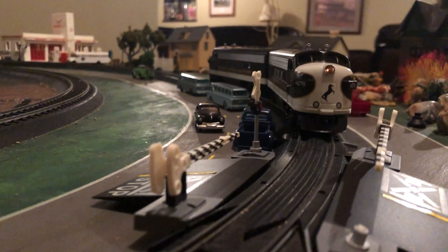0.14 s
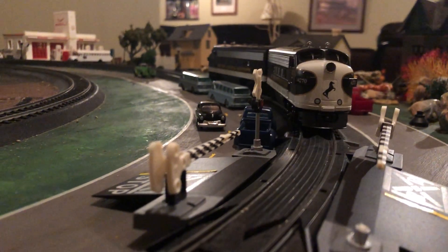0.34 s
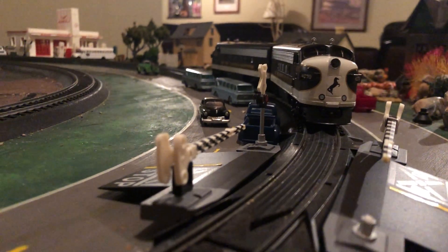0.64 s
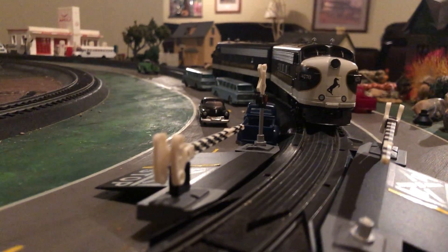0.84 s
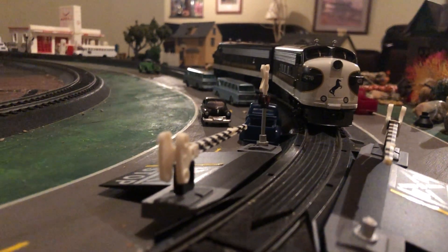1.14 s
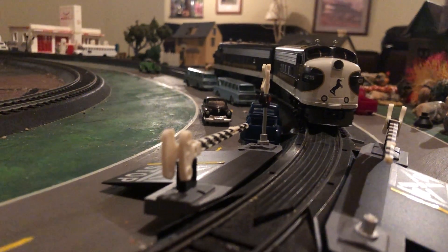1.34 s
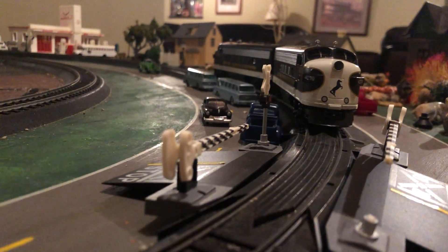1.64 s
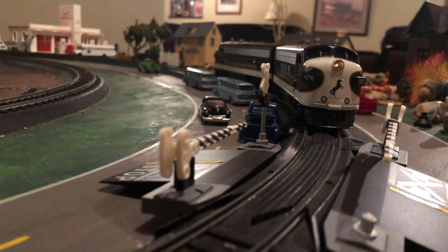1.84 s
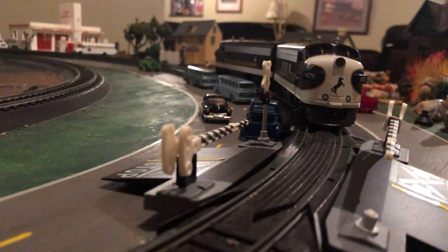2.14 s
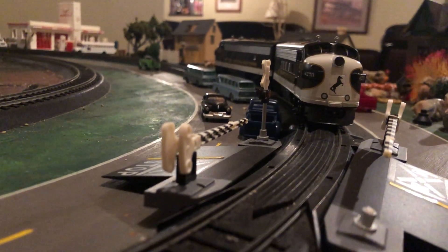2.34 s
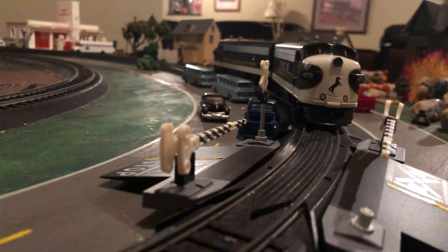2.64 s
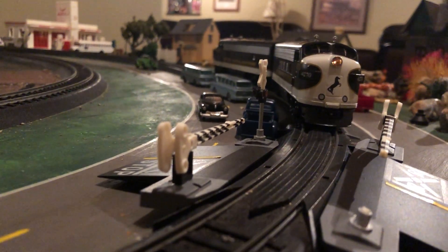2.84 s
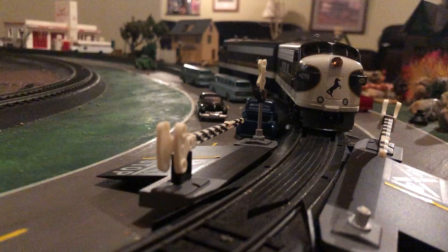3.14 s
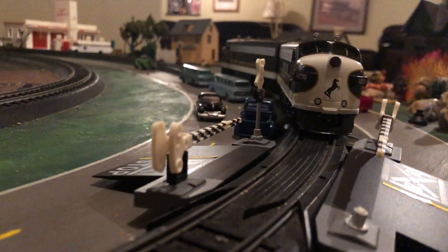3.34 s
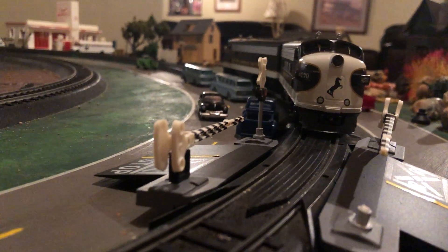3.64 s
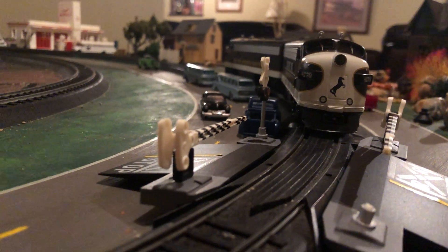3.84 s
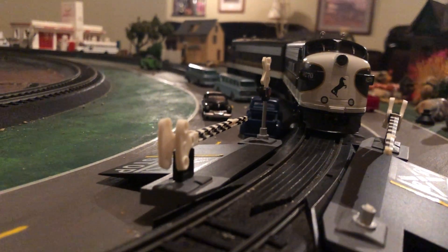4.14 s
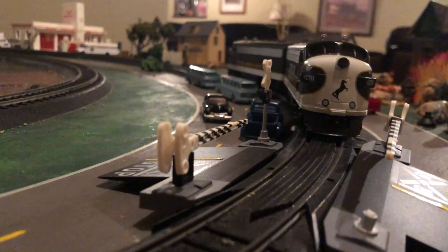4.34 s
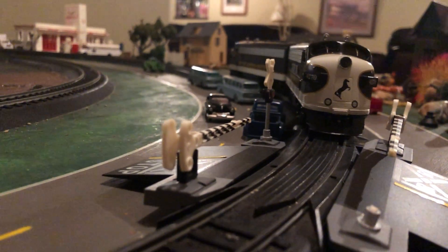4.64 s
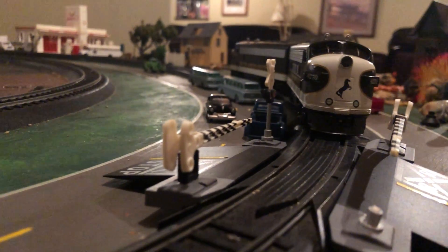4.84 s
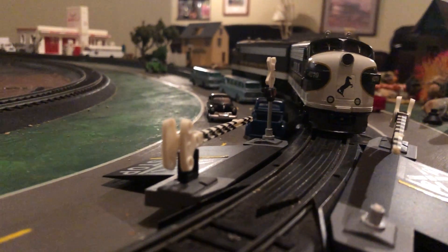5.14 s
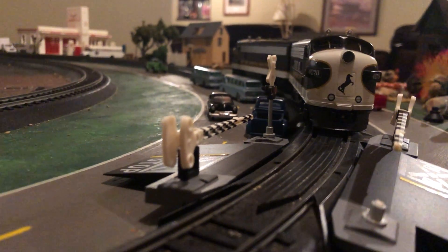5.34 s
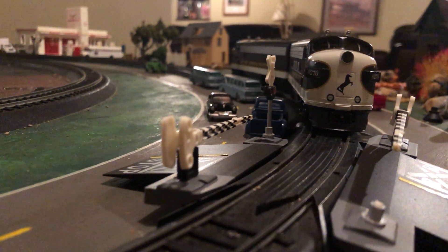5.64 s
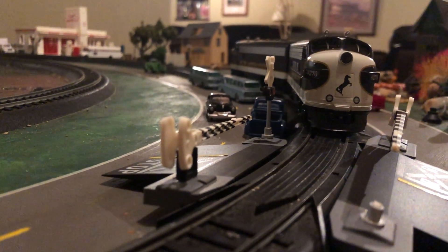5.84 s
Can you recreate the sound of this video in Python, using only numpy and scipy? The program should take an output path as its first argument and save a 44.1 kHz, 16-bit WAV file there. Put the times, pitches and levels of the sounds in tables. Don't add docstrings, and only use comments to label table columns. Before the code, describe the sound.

Close fumbling with a plastic toy housing, with sharp clicks, dry scraping bursts, little thuds and rubbery creaks over faint room hush.

```python
import sys
import numpy as np
from scipy import signal
from scipy.io import wavfile
from scipy.ndimage import uniform_filter1d

SR = 44100
rng = np.random.default_rng(int(sys.argv[2]) if len(sys.argv) > 2 else 0)


def persist_wave(psi):
    counts = np.round(np.clip(psi, -1, 1) * 32767).astype(np.int16)
    wavfile.write(sys.argv[1], SR, np.atleast_2d(counts).T)


def natural_amplitude(level_db):
    exponent = np.asarray(level_db, float) / 20
    return 10 ** exponent


N = 264600


def rms_one(x):
    return x / np.sqrt(np.mean(x ** 2) + 1e-20)


def peak_one(x):
    return x / np.max(np.abs(x))


def add(out, s, sound):
    i = round(s * SR)
    out[i:i + len(sound)] += sound[:N - i]


def band(x, low_hz, high_hz, order=2):
    edges_hz = [low_hz, min(high_hz, 0.45 * SR)]
    return signal.sosfilt(signal.butter(order, edges_hz, "band", fs=SR, output="sos"), x)


def drift(rate_hz, size=1):
    r = np.exp(-2 * np.pi * rate_hz * size / SR)
    white = rng.standard_normal((N + SR) // size + 1)
    slow = signal.lfilter([1], [1, -2 * r, r * r], white)[SR // size:]
    return np.interp(np.arange(N) / size, np.arange(len(slow)), rms_one(slow))


def resonate(x, peaks):
    out = 0
    for k, (hz, width_hz, db) in enumerate(peaks):
        r = np.exp(-np.pi * width_hz / SR)
        b = [(1 - r * r) / 2, 0, (r * r - 1) / 2]
        a = [1, -2 * r * np.cos(2 * np.pi * hz / SR), r * r]
        out = out + (-1) ** k * natural_amplitude(db) * signal.lfilter(b, a, x + 1e-18)
    return out


def coloured(x, spectrum, patchy_db):
    hz, db = np.transpose(spectrum)
    edges = hz[0] * 2 ** np.arange(0, np.log2(hz[-1] / hz[0]) + 0.3, 1 / 3)
    out = 0
    for k, (low, high) in enumerate(zip(edges, edges[1:])):
        level_db = np.interp(np.log(low * high) / 2, np.log(hz), db)
        flicker_db = patchy_db * drift(21, size=32)
        out = out + natural_amplitude(level_db + flicker_db) * band(x[k % 2], low, high)
    return rms_one(out)


def swells(rows, rest_db, rise_db_per_s, fall_db_per_s):
    t = np.arange(0, N + 32, 32) / SR
    out = np.full(len(t), float(rest_db))
    for s, length, db in rows:
        before, after = np.maximum(s - t, 0), np.maximum(t - s - length, 0)
        out = np.maximum(out, db - rise_db_per_s * before - fall_db_per_s * after)
    return np.interp(np.arange(N) / SR, t, out)


def burst(noise, decay_s):
    return noise * np.exp(-np.arange(len(noise)) / SR / decay_s)


def strike(noise, modes, lag_s, crackle_s, tilt_db, edge):
    out = np.zeros(noise.shape[1] + 800)
    for (hz, width_hz, db), crackle in zip(modes, noise):
        late_s = lag_s * np.log2(16000 / hz)
        kick = np.r_[edge, crackle[1:]]
        ring = resonate(burst(kick, crackle_s + late_s / 3), [(hz, width_hz, 0)])
        brighter_db = tilt_db * max(np.log2(hz / 3500), 0)
        add(out, late_s / 2, natural_amplitude(db + brighter_db) * np.sqrt(width_hz) * rms_one(ring))
    return peak_one(out)


# f/Hz, level/dB
HUSH = [(18, -35.5), (30, 1.5), (235, 2), (835, -3), (1060, -7.5), (1840, -20), (2220, -16.5),
        (3130, -23.5), (5300, -22), (14800, -21), (16500, -42)]
# t/s, level/dB
WHINE = [(0, -81), (.3, -67.5), (.475, -76), (.5, -83.5), (.53, -75), (.6, -79), (1, -87), (2, -90),
         (2.3, -88), (4.9, -93), (5.05, -86), (5.15, -84), (6, -90)]
HUSH_DB, WHINE_HZ = -70.5, 1647


def hush():
    tone = np.sin(2 * np.pi * np.cumsum(WHINE_HZ + 3 * drift(4.7)) / SR)
    s, db = np.transpose(WHINE)
    whine = natural_amplitude(np.interp(np.arange(N) / SR, s, db)) * tone
    return natural_amplitude(HUSH_DB) * coloured(rng.standard_normal((2, N)), HUSH, patchy_db=3.5) + whine


# t/s, length/s, scrape level/dB, board weight/dB, cloth share/dB
STROKES = [(0, 0.052, -44.5, 1, -7.5), (0.065, 0.16, -48, -4, -8.5), (0.64, 0.041, -66.5, 1, -5.5),
           (0.677, 0.017, -71, 8, 2), (0.934, 0.11, -64.5, 4, -1.5), (1.052, 0.069, -72.5, 12.5, -7.5),
           (1.133, 0.18, -68.5, -2, -10), (1.683, 0.0091, -41.5, -9, -5.5), (1.71, 0.016, -45.5, -4, -10),
           (1.743, 0.012, -42, 0.5, -4), (1.761, 0.06, -49.5, 1, -9.5), (1.835, 0.11, -55.5, 1.5, -8.5),
           (2.221, 0.12, -71.5, -4, -5), (2.498, 0.16, -66.5, -7, -21.5), (2.658, 0.043, -60.5, 1, -16),
           (2.709, 0.098, -56.5, 0.5, -10), (2.819, 0.04, -49.5, -3, -4.5), (2.887, 0.048, -51, -4, -10.5),
           (2.955, 0.355, -52, 0, -6), (3.328, 0.29, -66, -5.5, -17.5), (3.892, 0.11, -65, 1.5, -7.5),
           (4.424, 0.16, -68.5, -2, -6.5), (4.606, 0.11, -62.5, -19, -12.5), (4.721, 0.15, -71, 5.5, -25.5),
           (4.933, 0.07, -67, 1, -9.5), (5.122, 0.13, -74.5, -4.5, -6.5), (5.5, 0.23, -76, -12, -13)]
# t/s, length/s, level/dB
SHAKES = [(.3, 0.018, -73.5), (.99, 0.13, -64.5), (1.77, 0.022, -73.5), (2, 0.051, -63.5),
          (2.3, 0.29, -75.5), (3.91, 0.11, -63), (4.25, 0.035, -66.5), (4.6, 0.017, -56.5),
          (4.86, 0.048, -61), (5.01, 0.039, -68.5)]
# f/Hz, level/dB
SCRAPE = [(250, -37.5), (420, -7), (775, -1.5), (885, 0), (2440, -4.5), (2720, -8.5), (3080, -3.5),
          (6000, -21.5), (7800, -43), (13200, -120)]
# f/Hz, level/dB
CLOTH = [(1760, -27.5), (3000, -2), (3410, 3), (4220, -2), (4600, 3.5), (8500, -8), (15100, -15.5),
         (16200, -18.5), (16500, -48)]
# f/Hz, width/Hz, level/dB
PANEL = [(925, 130, 0.5), (1380, 54, -5), (1840, 100, -4), (2374, 210, -4), (3150, 150, -1), (3480, 70, -1)]
# f/Hz, width/Hz, level/dB
PORT = [(7300, 920, -5.5), (12570, 1400, 3), (15000, 900, 6.5)]
GRIP_DB_PER_S, LIFT_DB_PER_S = 899.5, 447
REST_THUD_DB, REST_SCRAPE_DB, REST_CLOTH_DB = -79, -80.5, -84.5
SHAKE_DB_PER_S, SETTLE_DB_PER_S, REST_RUMBLE_DB = 131, 87, -82.5
FIBRES_PER_S, FIBRE_DB = 870, -2.5


def dragging():
    s, length, db, weight_db, cloth_db = np.transpose(STROKES)

    def stroke_db(share_db, rest_db):
        return swells(zip(s, length, db + share_db), rest_db, GRIP_DB_PER_S, LIFT_DB_PER_S)

    catching = drift(43)
    grit = rng.standard_normal((2, N)) * natural_amplitude(1.1 * catching + 1.8 * drift(360))
    snapped = signal.lfilter([1], [1, -0.97], rng.random(N) < FIBRES_PER_S / SR)

    rumble_db = swells(SHAKES, REST_RUMBLE_DB, SHAKE_DB_PER_S, SETTLE_DB_PER_S)
    rumble = natural_amplitude(rumble_db) * rms_one(band(rng.standard_normal(N), 43, 76))

    thud_db = stroke_db(weight_db, REST_THUD_DB) + 1.1 * catching + 2.7 * drift(20, size=32)
    thud = natural_amplitude(thud_db) * rms_one(band(rng.standard_normal(N), 110, 370, order=3))

    scrape = coloured(grit, SCRAPE, patchy_db=1.2)
    scrape = rms_one(scrape + sum(resonate(scrape, [mode]) for mode in PANEL))
    scrape = natural_amplitude(stroke_db(0, REST_SCRAPE_DB)) * scrape

    hiss = coloured(grit[::-1] * (1 + natural_amplitude(FIBRE_DB) * snapped), CLOTH, patchy_db=1.5)
    hiss = rms_one(hiss + sum(resonate(hiss, [cavity]) for cavity in PORT))
    hiss = natural_amplitude(stroke_db(cloth_db, REST_CLOTH_DB)) * hiss
    return rumble + thud + scrape + hiss


# t/s, peak level/dB
THREADS = [(0.0767, -40), (1.6849, -31), (1.695, -45), (1.7719, -41), (1.789, -41), (1.8064, -49),
           (1.8214, -46), (1.855, -53), (2.4493, -53), (2.6413, -58), (2.655, -57), (2.727, -47),
           (2.7692, -48), (2.845, -41), (2.862, -46), (2.8913, -46), (2.9043, -41), (2.9105, -46),
           (2.935, -57), (2.9552, -47), (2.9946, -57), (3.0314, -63), (3.0849, -45), (3.29, -53)]


def threads():
    out = np.zeros(N)
    for (s, peak_db), noise in zip(THREADS, rng.standard_normal((len(THREADS), 600))):
        crack = band(burst(noise, 0.0022), 2600, 8000)
        add(out, s, natural_amplitude(peak_db + 2.5) * peak_one(crack))
    return out


# f/Hz, width/Hz, level/dB
HOUSING = [(410, 41, -8), (645, 70, -8), (1095, 160, -5.5), (1407, 32, 0), (1784, 100, -6), (1880, 72, -2),
           (2410, 120, -15), (2750, 70, -6), (3135, 240, -1.5), (3685, 91, -2.5), (3927, 53, -2.5),
           (4818, 84, -19)]
# t/s, peak level/dB, crack level over 4 kHz/dB
TICKS = [(0.189, -24, -49.5), (0.2486, -28, -52), (1.388, -28.5, -61), (1.422, -41, -60),
         (1.539, -27.5, -50.5), (1.632, -29.5, -55), (1.663, -32, -48), (1.672, -25.5, -55),
         (1.772, -42, -51.5), (2.293, -36.5, -58.5), (2.716, -39, -53.5), (2.784, -34, -61),
         (2.765, -47, -49), (2.969, -35, -49), (3.0618, -41, -38.5), (3.305, -31.5, -50), (4.447, -40, -65),
         (4.861, -39, -68.5), (5.112, -28.5, -81.5), (5.49, -45, -69), (5.5, -28.5, -59),
         (5.696, -34.5, -81), (5.823, -55, -72), (5.834, -28.5, -66), (5.93, -34, -81)]
# t/s, peak level/dB, knock under 1.1 kHz/dB, crack over 4 kHz/dB
BUMPS = [(.159, -24, -36, -46), (.177, -29.5, -62, -48), (.349, -45, -61.5, -78), (.794, -35.5, -58, -57),
         (.812, -39, -43, -40), (.946, -34.5, -43.5, -47), (.99, -38.5, -47.5, -51.5),
         (1.056, -47, -47.5, -63), (1.692, -48, -34.5, -53), (1.75, -32, -44, -48),
         (2.105, -45, -55, -64.5), (2.457, -59, -49, -60), (2.557, -46, -54, -71), (2.821, -29, -47, -50),
         (2.829, -41.5, -50, -46.5), (3.759, -52.5, -62, -62), (3.887, -53, -48.5, -63.5),
         (3.947, -66, -52.5, -60), (3.999, -58, -49, -62.5), (4.282, -57.5, -56.5, -83.5),
         (4.417, -59.5, -51, -76.5), (4.497, -55.5, -62.5, -64.5), (4.53, -36.5, -41.5, -44.5),
         (4.781, -44.5, -47.5, -61.5), (4.922, -55, -47, -53), (.705, -59, -53.5, -69),
         (1.085, -64, -51.5, -75), (1.745, -43, -40.5, -63), (.36, -60.5, -59.5, -76)]
TICK_KNOCK_DB = -24
TICK_EDGE = 1.3


def ticks():
    breaks = BUMPS + [(s, db, db + TICK_KNOCK_DB, crack_db) for s, db, crack_db in TICKS]
    out, noise = np.zeros(N), rng.standard_normal((len(breaks), len(HOUSING) + 2, 2600))
    damped = [(hz, 0.2 * width_hz + 110, db) for hz, width_hz, db in HOUSING]
    for (s, peak_db, knock_db, crack_db), (knock, crack, *rings) in zip(breaks, noise):
        ring = strike(np.array(rings), damped, lag_s=0.0005, crackle_s=0.001, tilt_db=-2.5, edge=TICK_EDGE)
        knock = band(burst(knock, 0.0072), 100, 1100)
        crack = band(burst(crack, 0.0022), 4000, 15000)
        add(out, s, natural_amplitude(peak_db - 5.0) * peak_one(band(ring, 650, 7700)))
        add(out, s, natural_amplitude(knock_db + 3.5) * peak_one(knock))
        add(out, s, natural_amplitude(crack_db + 4.5) * peak_one(crack))
    return out


# t/s, peak level/dB,
# f/Hz, decay/cycles
TAPS = [(.1615, -32, 325, 1.42), (.164, -38.5, 200, 2.8), (.35, -50, 192, 2.1), (.703, -54, 217, 4.0),
        (.835, -37.5, 200, 2.9), (1.689, -32.5, 237.4, 1.37), (1.755, -53, 75, 2.6), (2.828, -35, 334, 1.7),
        (3.59, -58.5, 190.3, 2.8), (5.153, -59.5, 240, 2.52), (.1617, -23, 4040, 1.2),
        (.1765, -31.5, 5960, 3.0), (.2503, -35, 6000, 2.2), (.801, -51.5, 10960, 4.9),
        (.8355, -38, 12300, 9.0), (1.3868, -49, 8900, 1.5), (1.6625, -38.5, 6000, 2.62),
        (1.698, -35.5, 6900, 3.63), (1.7505, -29, 3600, 4.8), (1.7718, -32, 5800, 3.5),
        (2.8213, -31.5, 6900, 3.0), (2.8297, -37, 3540, 1.2), (2.9955, -46, 6500, 3.0),
        (3.0204, -46, 3750, 2.7), (3.062, -31, 3380, 1.18), (3.0855, -51, 7000, 2.95),
        (3.166, -39, 3410, 2.83), (3.588, -27, 3900, 1.32), (4.552, -36.5, 10430, 6.0),
        (0.8247, -8.5, 3900, 3.5), (4.5425, -18, 2549, 1.1), (4.5445, -15.5, 2090, 2.5),
        (4.519, -47, 11000, 1.5), (3.76, -54, 5000, 4.3), (3.865, -65, 3500, 2.5), (5.9075, -48, 3300, 2.5),
        (5.916, -49, 3412, 2.5), (5.998, -51, 1490, 1.5)]


def taps():
    out = np.zeros(N)
    for s, peak_db, hz, cycles in TAPS:
        turns = np.arange(round(8 * cycles * SR / hz)) * hz / SR
        swell = (1 - np.exp(-3.0 * turns)) * np.exp(-turns / cycles)
        add(out, s, natural_amplitude(peak_db) * peak_one(np.sin(2 * np.pi * turns) * swell))
    return out


# t/s, peak level/dB, tilt/(dB per octave)
SNAPS_A = [
    (.2549, -9.5, 0.5),
    (1.9252, -8.5, 0.5),
    (3.5855, -25, -8),
]
# t/s, peak level/dB, tilt/(dB per octave)
SNAPS_B = [
    (.8227, -4, 0.00016),
]
# t/s, peak level/dB, tilt/(dB per octave)
SNAPS_C = [
    (4.5413, -6, 0.0011),
]
# f/Hz, width/Hz, level/dB
LATCH_A = [(210, 74, -19), (407, 210, -18), (630, 24, -5.5), (1015, 73, -3.5), (1280, 110, -12.5),
           (1833, 81, -2), (3144, 1100, -14), (3940, 220, -1.5), (5760, 370, -12.5), (7400, 740, -8.5),
           (9020, 610, -13), (12480, 1100, -14), (16280, 530, -19)]
# f/Hz, width/Hz, level/dB
LATCH_B = [(200, 380, -9.5), (426, 110, -1), (620, 20, 0), (996, 88, -1), (1710, 230, -1.5),
           (2470, 140, -1), (3670, 550, 1), (5000, 562, -10), (6730, 3700, -17), (9400, 690, -1),
           (11950, 1300, -4.5), (13700, 568, -8.5), (14260, 600, -5)]
# f/Hz, width/Hz, level/dB
LATCH_C = [(290.5, 39, -8.5), (690, 250, -11.5), (927, 120, 1), (1313, 49, 2.5), (2000, 72, 2.5),
           (2460, 87, 1), (2740, 150, 1), (3302, 367, -4), (4780, 690, -3.5), (6500, 1300, -15.5),
           (9500, 900, -3), (10980, 1060, -10), (13900, 1400, -11.5), (15320, 620, -5)]
# f/Hz, width/Hz, level/dB
SPRING = [(3980, 10.4, -38), (3730, 15, -34.5), (3900, 33, -38.5)]
# f/Hz, width/Hz, level/dB
FAR_CAVITIES = [(4200, 1500, -6), (8700, 1100, -3), (12500, 1000, 3), (15100, 900, 3)]
SNAP_EDGE, SOFT_EDGE = 4.7, 2.5
FAR_TILT_HZ = 3027


def snaps():
    out, far = np.zeros(N), np.zeros(N)
    t = np.arange(SR // 4) / SR
    latches = ((SNAPS_A, LATCH_A, 0.0003, SNAP_EDGE, SPRING),
               (SNAPS_B, LATCH_B, 0.0008, SOFT_EDGE, []),
               (SNAPS_C, LATCH_C, 0.0006, SOFT_EDGE, []))
    for events, latch, lag_s, edge, spring in latches:
        noises = rng.standard_normal((len(events), len(latch), 4000))
        for (s, peak_db, tilt_db), noise in zip(events, noises):
            snap = strike(noise, latch, lag_s, 0.0015, tilt_db, edge)
            add(out, s, natural_amplitude(peak_db) * band(snap, 130, 17500))
            far[round(s * SR)] = natural_amplitude(peak_db + tilt_db / 2)
            for hz, width_hz, db in spring:
                ring = np.sin(2 * np.pi * hz * t) * np.exp(-np.pi * width_hz * t)
                add(out, s, natural_amplitude(peak_db + db + tilt_db) * ring)
    dull = np.exp(-2 * np.pi * FAR_TILT_HZ / SR)
    far = band(signal.lfilter([1], [1, -dull], far), 250, 19000, order=1)
    return out, far + sum(resonate(far, [cavity]) for cavity in FAR_CAVITIES)


# delay/s, level/dB
ECHOES = [(.0112, -22), (.0148, -25), (.026, -30), (.041, -34)]


def walls(x):
    bright = band(x, 3500, 16000, order=1)
    return sum(natural_amplitude(db) * np.roll(bright, round(s * SR)) for s, db in ECHOES)


# t/s, length/s, level/dB, brightness/dB
GRATES = [(0.996, .02, -55, -16), (1.053, 0.062, -66.5, -26), (1.194, .011, -50.5, -4.5),
          (1.306, 0.016, -52, -4), (1.41, 0.034, -74, 3), (1.536, 0.016, -57, -9), (1.625, 0.033, -64, -4),
          (2.085, 0.014, -59.5, -15), (2.291, 0.015, -50, -23), (4.69, 0.028, -61, -25),
          (4.978, .025, -61.5, -24)]
# t/s, length/s, level/dB, start f/Hz, end f/Hz
SQUEAKS = [(0.493, .015, -58.5, 930, 980), (0.657, 0.053, -67.5, 610, 690), (1.003, .017, -43.5, 744, 820),
           (1.207, 0.012, -62, 1100, 1540), (1.246, .012, -50, 970, 1180), (1.26, .014, -47.5, 960, 915),
           (1.388, 0.021, -50, 1020, 920), (2.097, 0.0098, -51.5, 980, 905),
           (2.451, 0.016, -56.5, 1070, 885), (3.788, .013, -57.5, 1040, 850),
           (4.862, 0.012, -55, 1190, 880), (3.807, 0.012, -63.5, 1980, 1880),
           (1.555, .014, -60.5, 1080, 1020), (3.952, .045, -70.5, 650, 640),
           (5.982, .016, -61.5, 1800, 1890), (3.304, .012, -51, 2350, 1100), (2.3, .016, -59, 960, 930),
           (4.781, .014, -60, 1090, 960), (1.052, .01, -51, 920, 915)]
# t/s, length/s, level/dB, f/Hz
WHISTLES = [(1.14, .038, -84.5, 1740), (2.519, .019, -75, 1790), (2.565, 0.015, -78.5, 1900),
            (2.646, .019, -73.5, 1810), (5.113, .035, -83.5, 1830), (5.165, .06, -85, 1830)]
# t/s, f/Hz, level/dB
GROANS = [
    [(3.325, 1780, -59), (3.334, 1600, -44.5), (3.344, 1030, -54.5), (3.353, 550, -48.5),
     (3.372, 300, -64.5), (3.385, 300, -56), (3.415, 350, -53.5), (3.428, 390, -51.5)],
    [(3.429, 550, -66), (3.438, 720, -59), (3.452, 820, -56), (3.463, 480, -55), (3.47, 650, -66),
     (3.478, 1150, -57), (3.492, 1620, -50), (3.501, 1530, -55.5)],
    [(3.502, 1400, -63), (3.507, 1350, -68), (3.509, 670, -49.5), (3.525, 710, -62), (3.54, 530, -53),
     (3.552, 900, -59), (3.562, 1780, -61), (3.578, 1900, -72)],
    [(5.247, 1350, -58), (5.255, 810, -49.5), (5.262, 470, -53.5), (5.279, 510, -53.5), (5.295, 450, -61),
     (5.311, 510, -50.5)],
    [(5.313, 390, -58.5), (5.322, 385, -57), (5.333, 362, -51), (5.345, 320, -58.5), (5.362, 300, -61.5)],
    [(5.505, 680, -53.5), (5.537, 710, -54.5), (5.555, 930, -52.5), (5.572, 1090, -48), (5.588, 1190, -58),
     (5.598, 1410, -47.5), (5.607, 1900, -63), (5.62, 1850, -73), (5.635, 1850, -77)],
    [(5.647, 1150, -62.5), (5.656, 700, -53), (5.664, 460, -54), (5.68, 380, -80)],
    [(5.701, 440, -57), (5.72, 520, -58), (5.73, 440, -57), (5.742, 400, -71.5)],
    [(5.892, 720, -63), (5.903, 460, -56.5), (5.924, 465, -66)],
    [(5.93, 370, -63), (5.95, 470, -52), (5.958, 770, -46.5), (5.966, 1100, -57), (5.974, 1700, -66)],
]
# t/s, f/Hz, level/dB
GLIDES = [
    [(4.886, 1900, -76), (4.903, 1700, -65), (4.911, 1230, -60), (4.917, 930, -60.5), (4.925, 540, -63.5),
     (4.937, 600, -74)],
    [(.43, 740, -82), (.455, 680, -78), (.475, 360, -78), (.494, 200, -74)],
    [(5.84, 900, -48.5), (5.851, 1090, -52), (5.858, 1320, -58.5), (5.869, 1400, -55.5), (5.888, 1460, -77)],
]
GRATE_PER_S, GRATE_UNEVEN = 600, 0.36
SQUEAK_UNEVEN, SQUEAK_BRIGHT_DB = 0.16, -10.5
WHISTLE_UNEVEN, WHISTLE_BRIGHT_DB = 0.08, 14
GROAN_UNEVEN, GROAN_BRIGHT_DB, GLIDE_BRIGHT_DB = 0.0322, -2.5, -7


def joint():
    per_s, uneven = np.full(N, float(GRATE_PER_S)), np.full(N, GRATE_UNEVEN)
    push = np.zeros((2, N))
    moves = []
    for s, length, db, bright_db in GRATES:
        rows = [(s, GRATE_PER_S, db), (s + length, GRATE_PER_S, db)]
        moves.append((rows, GRATE_UNEVEN * GRATE_PER_S / 1000, bright_db))
    for s, length, db, first, last in SQUEAKS:
        moves.append(([(s, first, db), (s + length, last, db)], SQUEAK_UNEVEN, SQUEAK_BRIGHT_DB))
    for s, length, db, rate in WHISTLES:
        moves.append(([(s, rate, db), (s + length, rate, db)], WHISTLE_UNEVEN, WHISTLE_BRIGHT_DB))
    moves += [(rows, GROAN_UNEVEN, GROAN_BRIGHT_DB) for rows in GROANS]
    moves += [(rows, GROAN_UNEVEN, GLIDE_BRIGHT_DB) for rows in GLIDES]
    for rows, stumble, bright_db in moves:
        s, rate, db = np.transpose(rows)
        i = np.arange(round(s[0] * SR), min(round(s[-1] * SR), N))
        per_s[i] = np.interp(i / SR, s, rate)
        uneven[i] = stumble * 1000 / per_s[i]
        push[:, i] = natural_amplitude(np.interp(i / SR, s, db) + np.array([[0], [bright_db]]))
    return per_s, uneven, push


def creaks():
    per_s, uneven, push = joint()
    turns = np.cumsum(per_s * np.clip(1 + uneven * drift(400), 0.2, 3)) / SR
    at = np.flatnonzero(np.diff(np.floor(turns)) > 0)
    early = turns[at + 1] % 1 / (turns[at + 1] - turns[at])
    size = np.sqrt(SR / per_s[at]) * natural_amplitude(8.17 * uneven[at] * drift(610)[at])
    kicks = np.zeros(N)
    kicks[at], kicks[at + 1] = size * early, size * (1 - early)
    push = uniform_filter1d(push, size=180, axis=1)
    low_modes = [m for m in HOUSING if m[0] < 2300]
    high_modes = [m for m in HOUSING if m[0] >= 2300]
    out, white = 0, rng.standard_normal(SR)
    for load, modes in zip(push, (low_modes, high_modes)):
        out = out + resonate(kicks * load, modes) / np.std(resonate(white, modes))
    direct = natural_amplitude(-8) * kicks * push[0]
    return band(out + direct, 280, 4400, order=6)


# t/s, length/s, level/dB
BRUSHES = [(.62, 0.079, -77), (.95, 0.098, -70.5), (1.125, 0.065, -73.5), (1.27, 0.033, -76),
           (1.4, 0.042, -73), (2.22, 0.096, -79), (2.5, 0.076, -72), (2.63, 0.043, -72.5),
           (3.89, 0.11, -79), (4.42, 0.036, -85), (4.65, 0.067, -80.5), (4.93, 0.069, -80),
           (5.115, 0.093, -76), (5.57, 0.065, -81)]
# f/Hz, width/Hz, level/dB
BRUSH_CAVITIES = [(7500, 670, -3), (10000, 900, -5), (12360, 350, 1.5), (14980, 670, 0)]


def brushes():
    level_db = swells(BRUSHES, -100, 600, 550)
    hiss = rms_one(resonate(rng.standard_normal(N), BRUSH_CAVITIES))
    return natural_amplitude(level_db + 2.0 * drift(40)) * hiss


# f/Hz, t60/s, level/dB
ROOM = [(141, 0.38, -11), (393.5, 0.13, -16.5), (999, 0.056, -19.5), (2320, 0.11, -21),
        (5770, 0.091, -20.5), (13180, 0.24, -27.5)]
LATE_T60_S, LATE_DB, LATE_CUT_HZ = 0.36, -12.5, 5700


def room(x):
    t, tail = np.arange(SR // 2) / SR, 0
    for hz, t60_s, db in ROOM:
        dying = band(rng.standard_normal(len(t)), hz / 1.7, hz * 1.55) * (t > 0.004)
        late = natural_amplitude(LATE_DB - 60 * t / LATE_T60_S) / (1 + hz / LATE_CUT_HZ)
        dying = dying * (natural_amplitude(-60 * t / t60_s) + late)
        tail = tail + natural_amplitude(db) * dying / np.sqrt(np.sum(dying ** 2) * SR / (1.8 * hz))
    return signal.fftconvolve(x, tail)[:N]


def scene():
    small, contacts = creaks() + ticks(), taps()
    hard, far = snaps()
    sent = natural_amplitude(8.0) * small + contacts + natural_amplitude(-1.5) * band(hard, 150, 2500, order=1) + natural_amplitude(15.5) * far
    near = small + contacts + hard + walls(hard)
    return (near + room(sent) + dragging() + hush() + brushes() + threads())[None]


def top_cut(x):
    return signal.sosfilt(signal.butter(12, 16810, fs=SR, output="sos"), x)


def record(dry):
    x = signal.sosfilt(signal.butter(4, 44, "high", fs=SR, output="sos"), dry)
    x = signal.sosfilt(signal.cheby2(12, 60, 16800, fs=SR, output="sos"), x)
    return top_cut(x)


dry = scene()
out = record(dry)
persist_wave(out)
```